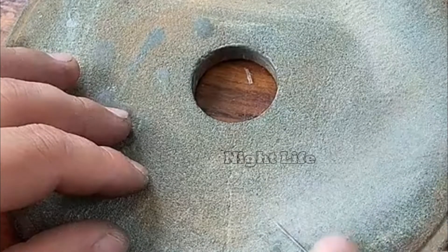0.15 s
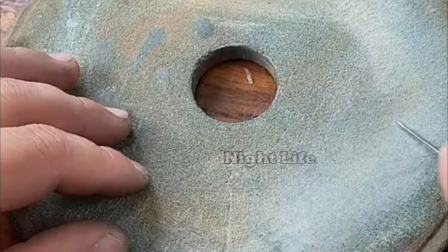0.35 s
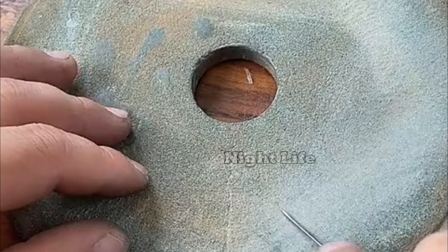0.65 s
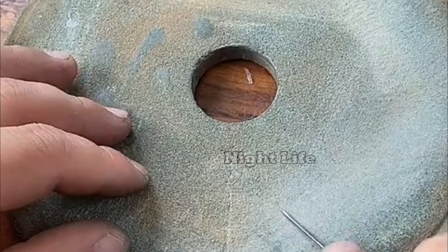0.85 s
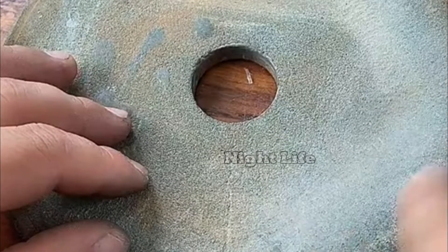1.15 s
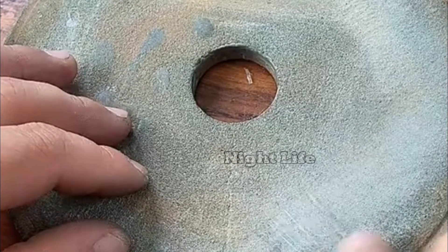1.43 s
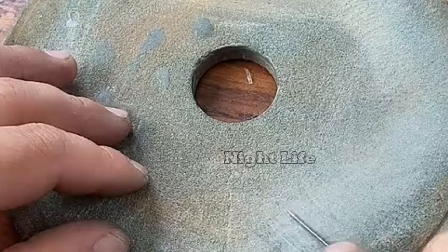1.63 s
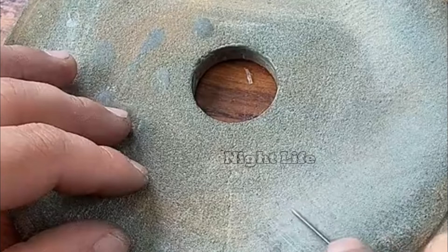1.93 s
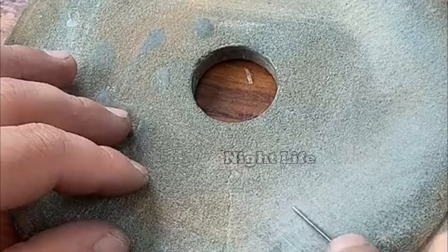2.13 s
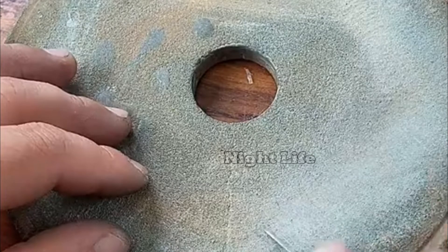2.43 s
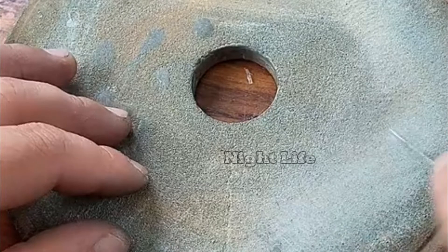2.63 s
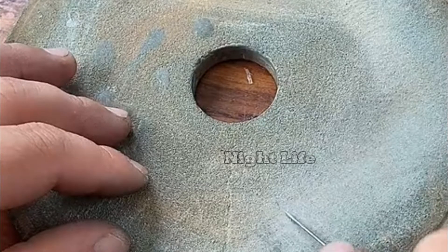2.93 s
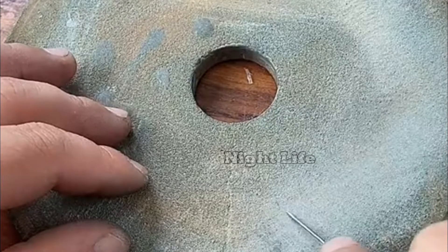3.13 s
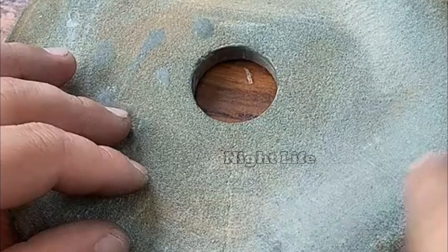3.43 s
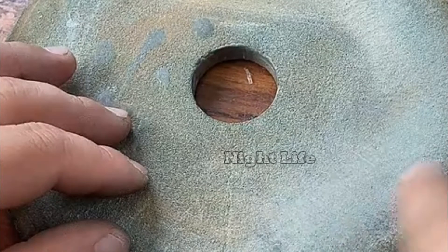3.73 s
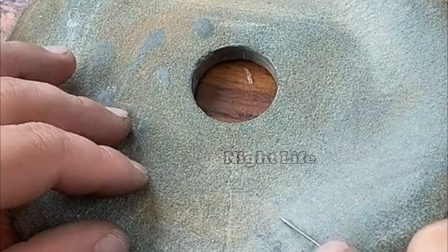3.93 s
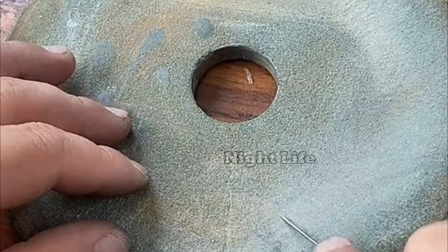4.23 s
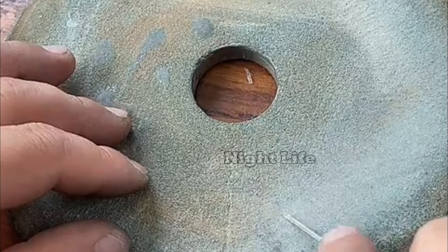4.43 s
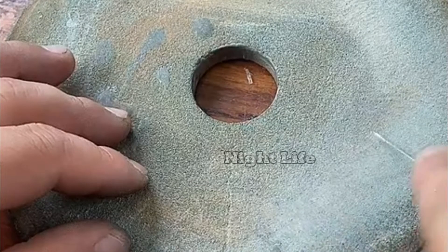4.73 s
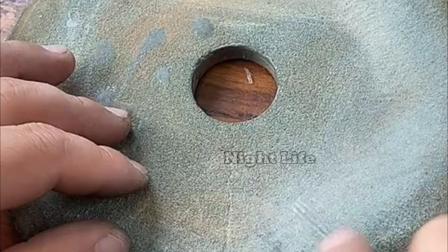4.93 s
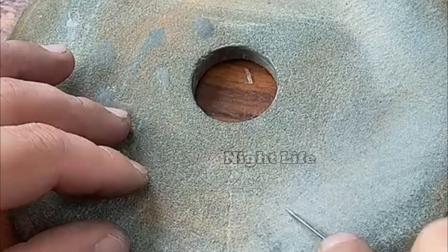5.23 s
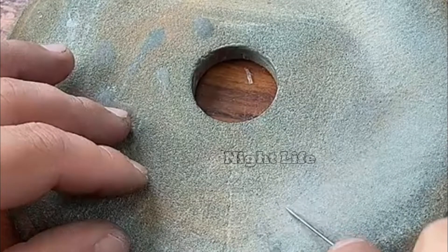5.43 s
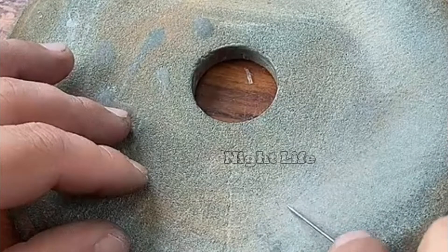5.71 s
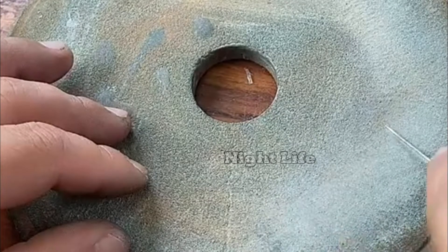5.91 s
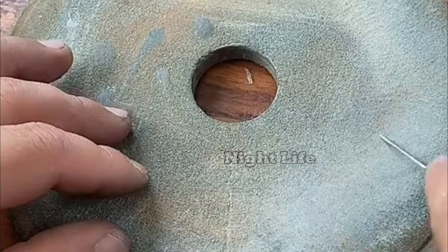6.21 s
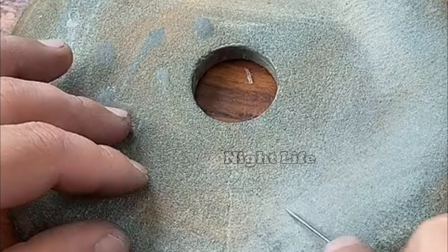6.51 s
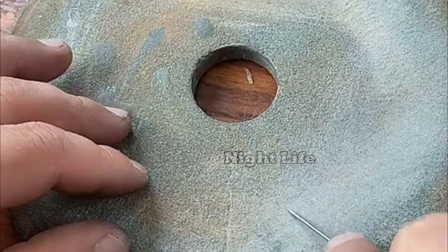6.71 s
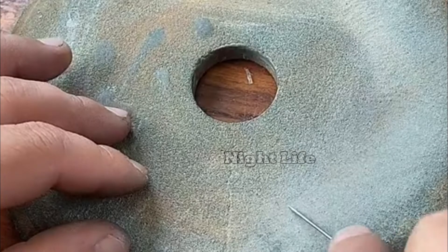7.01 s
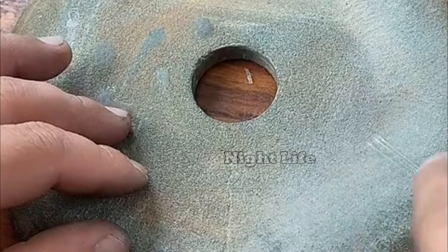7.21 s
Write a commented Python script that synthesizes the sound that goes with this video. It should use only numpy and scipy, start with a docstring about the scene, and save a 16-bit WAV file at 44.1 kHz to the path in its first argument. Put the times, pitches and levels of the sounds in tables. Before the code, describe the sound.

A thin steel hook point is sharpened by hand on a flat grinding stone, heard close and nearly dry in a quiet workshop. It scrapes in short runs of about half a second: a light landing, a firm pull, a lighter push and a hard sweep off. Each stroke is a gritty rasp with a high fizz, a slight metallic ring and a low drone from the stone. Runs begin right at the start and at about 1, 2.2, 3.3, 4.4, 5.8 and 7 seconds, the last still going at the end. Hands bump the wooden bench with soft, low thuds in and between runs, most clearly around 4 and 6.3 seconds. A tiny dry tick falls in the pause at 3 seconds. Faint, distant birds chirp in the first second or so and again between 5 and 6 seconds, over soft room tone.

```python
"""A quiet workshop, one microphone close to a flat grinding wheel lying on a wooden bench.
From the start a steel hook point is honed by hand in short runs: it lands lightly, is pulled back hard,
pushed forward lightly and swept off hard. Grit catches it, so the steel rasps and rings, and where it
bites the wheel drones. Hands bump the bench in and between runs; far birds chirp now and then over the
room's air. A dry tick falls in the pause at 3 s, and the seventh run is under way at the end."""
import sys
import numpy as np
from scipy import signal
from scipy.io import wavfile
from scipy.ndimage import uniform_filter1d

SR = 44100
rng = np.random.default_rng(int(sys.argv[2]) if len(sys.argv) > 2 else 0)


def digitize_waveform(pressure):
    """Quantize a signal to 16-bit integers and store it at the path in sys.argv[1].

    Rows of a 2-D input are taken as channels; values are limited to [-1, 1].
    """
    field = np.atleast_2d(pressure).T
    bounded = np.clip(field, -1, 1)
    quanta = np.round(bounded * 32767).astype(np.int16)
    wavfile.write(sys.argv[1], SR, quanta)


N = 324840

# passes of the point over the wheel, close to the microphone:
# (start [s], end [s], kind, bite time [s], rasp level [dB], wheel level [dB], shank level [dB])
HOOK_STROKES = [(0.029, .176, "pull", .053, -40.5, -27, -54), (0.188, 0.294, "push", .255, -43.5, -38, -54),
                (0.307, 0.468, "sweep", .339, -42.5, -32.5, -49),
                (0.979, 1.095, "land", .98, -44, -38, -64), (1.11, 1.261, "pull", 1.167, -37, -24.5, -52),
                (1.251, 1.387, "push", 1.335, -38, -35, -55),
                (1.386, 1.575, "sweep", 1.427, -37.7, -30, -49),
                (2.156, 2.256, "land", 2.194, -39, -31, -54),
                (2.272, 2.428, "pull", 2.329, -36.3, -25.5, -48),
                (2.418, 2.543, "push", 2.496, -37, -36.5, -58),
                (2.551, 2.689, "sweep", 2.592, -34.5, -29.5, -43),
                (3.28, 3.401, "land", 3.283, -43, -38, -57), (3.403, 3.559, "pull", 3.454, -39, -31, -48.5),
                (3.552, 3.667, "push", 3.616, -41, -38.5, -53),
                (3.669, 3.818, "sweep", 3.707, -36.7, -31.5, -62),
                (4.433, 4.567, "land", 4.445, -40.5, -36.5, -48.5),
                (4.556, 4.736, "pull", 4.625, -38, -31, -47),
                (4.712, 4.842, "push", 4.788, -37.5, -37.3, -53),
                (4.846, 5.007, "sweep", 4.868, -35.5, -28.5, -41.5),
                (5.756, 5.882, "land", 5.814, -40, -40.5, -62), (5.881, 6.042, "pull", 5.95, -34, -27, -44),
                (6.035, 6.154, "push", 6.115, -35, -35, -64),
                (6.157, 6.317, "sweep", 6.202, -33.5, -28.5, -41),
                (7.037, 7.176, "land", 7.047, -41, -41, -60),
                (7.185, 7.324, "pull", 7.228, -37, -31.5, -45),
                (7.307, 7.44, "push", 7.365, -40.5, -35, -43)]
# hand movement by kind of stroke: (skew [under 1 = fastest early], pointedness of the speed arch [power],
# slide before the grit holds [s], bite length [share of stroke], wheel drive from sliding [share])
HAND_MOTION = {"land": (1.01, 0.36, .001, 0.46, 1.4), "pull": (0.95, 1.36, 0.022, 0.37, .85),
               "push": (1.08, 0.72, 0.027, 0.034, 0.47), "sweep": (0.6, 1.71, 0.014, .44, 1)}
# tone by kind of stroke: (overtones [dB re rasp], sizzle [dB re rasp], tip whine [dB re rasp],
# treble lift of the rasp [dB], contact resonance at full speed [Hz])
STROKE_TONE = {"land": (-5, -0.5, -26, -0.4, 10558), "pull": (-3, -2, -17, 2, 10391),
               "push": (-3.5, -3, -21, 2.1, 10100), "sweep": (-5.5, -1.7, -17, 1, 10050)}
# treble of each run, as the point is set down at a new angle: (time [s], level [dB])
RUN_TREBLE = [(.25, 2.5), (1.27, 1.4), (2.42, -1.5), (3.55, -0.7), (4.72, 1), (6.04, -1.6), (7.2, -1)]
# modes of the hook's shank and of its tip: (frequency [Hz], width [Hz], level [dB])
SHANK_MODES = [(2515, 90, -6), (3390, 150, -6), (3650, 300, -10), (5340, 90, -6), (5810, 44, -1.5),
               (6062, 45, -4), (6765, 55, -5), (12008, 35, -9)]
TIP_MODES = [(12232, 36, 0), (12320, 60, -3)]
# modes of the wheel, damped by the resting hand: (frequency [Hz], width [Hz], level [dB])
WHEEL_MODES = [(201.2, 27, -9.5), (252.3, 24.4, -5), (323.6, 32, 2), (378.3, 33, 1.5), (430, 57, -8.5),
               (503.6, 22, -8.5)]
# colour of a grain of grit in the rasp, sizzle and wheel overtones: (frequency [Hz], level [dB])
RASP_SPECTRUM = [(1200, -28.5), (1700, -7), (1950, -3), (2500, -1), (3400, 1.5), (4050, -2.5), (4700, -8),
                 (5400, -7), (6900, -7), (7450, -8.5), (7950, -9), (8500, -7.5), (9100, -7.5), (10500, -21)]
SIZZLE_SPECTRUM = [(8200, -28.5), (9350, -9.5), (9750, -0.5), (10300, -1.5), (11000, -3), (11600, -7.5),
                   (12400, -9.5), (13000, -12.5), (14200, -22), (16000, -21)]
OVERTONE_SPECTRUM = [(400, -24.5), (560, -1), (760, -3.5), (930, 3.5), (1130, 0.5), (1350, -7.5),
                     (1650, -11), (2100, -26)]
# hands bumping the wheel and bench: (time [s], level [dB], pitch [Hz])
HAND_BUMPS = [(0.708, -32, 57.5), (.754, -31.5, 70), (.785, -29, 51), (.884, -27, 50), (1.637, -29, 71.5),
              (1.783, -33, 62.4), (1.82, -30.5, 63.5), (1.928, -26, 51.7), (2.174, -27, 51),
              (2.502, -31, 70.4), (3.398, -30, 64), (3.548, -29, 42), (3.922, -30, 73.5),
              (3.955, -23, 52.6), (4.045, -32.5, 64.4), (5.914, -24.5, 70.5), (6.279, -20, 56),
              (6.349, -34.5, 62)]
# low rumble of the bench: (frequency [Hz], level [dB])
BENCH_SPECTRUM = [(22, -20), (32, 4.5), (55, -2.5), (80, -2.5), (105, -8.5), (130, -0.5), (165, -13),
                  (260, -33), (500, -62)]
# the two pings of one small dry tick: (time [s], frequency [Hz], width [Hz], level [dB])
TICK_PINGS = [(3.045, 7940, 780, -28.5), (3.0478, 7540, 1200, -34)]
# small birds far off: (time [s], length [s], first pitch [Hz], last pitch [Hz], level [dB])
BIRD_CHIRPS = [(0.146, 0.032, 2730, 2720, -42.5), (0.459, 0.0525, 2830, 2545, -46.5),
               (0.71, 0.058, 2314, 1816, -55), (1.0, 0.043, 3090, 2810, -42.5),
               (1.048, 0.038, 2394, 2566, -43.5), (1.077, .027, 2925, 3050, -37),
               (5.133, 0.02, 2500, 3030, -46), (5.511, 0.051, 1993, 1880, -53),
               (5.785, 0.086, 2950, 2645, -40), (5.849, 0.054, 3300, 3020, -40.5),
               (6.097, .043, 2770, 2490, -40.5)]
# the workshop's air: (frequency [Hz], level [dB])
AIR_SPECTRUM = [(71, -32.5), (120, -20), (141, -21), (163, -33), (192, -8), (261, -18), (289, -13.5),
                (400, -12.5), (491, -17.5), (963, -20), (1890, -26.5), (6570, -35), (8560, -36),
                (15800, -61.5)]
# the workshop's reverberation: (frequency [Hz], time to fall 60 dB [s])
ROOM_DECAY = [(150, .25), (500, .3), (3000, .3), (8000, .28), (15000, .24)]


def stroke(row, skim_s=.027, bite_s=.0032, release_s=.036, treble_hz=4700):
    """One pass of the point, heard close: the same grains shake the steel and the wheel."""
    start, end, kind, bite, rasp_db, wheel_db, shank_db = row
    skew, pointed, slide_s, bite_share, slide_drive = HAND_MOTION[kind]
    overtone_db, sizzle_db, tip_db, lift_db, contact_hz = STROKE_TONE[kind]
    bright_db = np.interp(start, *np.transpose(RUN_TREBLE))
    t = start - skim_s + np.arange(SR // 3) / SR
    progress = np.clip((t - start) / (end - start), 0, 1)
    grip = np.clip((t - start - slide_s) / bite_s + .5, 0, 1)
    speed = hand_speed(progress, skew, pointed, skim_s)
    speed *= amp(-3 * (1 - grip))  # the point slides lightly until the grit takes hold
    hold_s = bite_share * (end - start)
    pressure = np.clip((t - bite) / bite_s, 0, 1) * np.clip(1 - (t - bite - hold_s) / release_s, 0, 1)
    grains = grit(len(t))
    scrape = grains * speed
    # the angle of the point sets how bright it rasps and which shank modes it favours
    rasp_spectrum = [(hz, db + (lift_db + bright_db) * (hz > treble_hz)) for hz, db in RASP_SPECTRUM]
    shank_modes = [(hz + width * rng.uniform(-1.05, 1), width, db + 3 * rng.standard_normal())
                   for hz, width, db in SHANK_MODES]
    drone = wheel_drone(grains, pressure + slide_drive * np.sqrt(speed))
    overtones = colour(grains * (speed + .5 * pressure), OVERTONE_SPECTRUM)
    tip_whine = ring(grains * progress ** 2, TIP_MODES) * speed
    layers = [(colour(scrape, rasp_spectrum), rasp_db - .5),
              (sizzle(scrape, speed, contact_hz), rasp_db + sizzle_db + bright_db),
              (ring(scrape, shank_modes), shank_db + 1),
              (tip_whine, rasp_db + tip_db - 6),
              (drone, wheel_db),
              (overtones, rasp_db + overtone_db)]
    length_gain = np.sqrt((end - start) * SR / len(t))  # sets the rms over the stroke's own length
    return t[0], length_gain * sum(amp(db) * unit_rms(sound) for sound, db in layers)


def hand_speed(progress, skew, pointed, skim_s, touch_s=.016, skim_db=-12):
    """An arch of speed: fingers cushion the touch and lift, and the point skims on through the turn."""
    arch = np.maximum(np.sin(np.pi * progress ** skew), 0) ** pointed
    cushioned = abs(uniform_filter1d(arch, int(touch_s * SR) + 1))
    return cushioned + amp(skim_db) * abs(uniform_filter1d(cushioned, int(2 * skim_s * SR)))


def grit(count, median_gap_s=1 / 450, crumble_s=.00069, fine_db=-4, clump_db=2):
    """The point catches at uneven intervals; each catch crumbles in a burst, with fine abrasion between."""
    gaps, dust = rng.standard_normal((2, count))
    at = (np.cumsum(np.exp(.6 * gaps)) * median_gap_s * SR).astype(int)
    catches = np.zeros(count)
    catches[at[at < count]] = 1
    bursts = unit_rms(die_away(catches, crumble_s))
    return dust * np.hypot(bursts, amp(fine_db)) * amp(clump_db * wander(count, 149.5))


def sizzle(scrape, speed, full_speed_hz, rest_hz=9900, width_hz=1300, rock_hz=350):
    """High fizz of the grit; the contact resonance climbs with speed and wavers as the point rocks."""
    glide_hz = rest_hz + (full_speed_hz - rest_hz) * speed + rock_hz * wander(len(scrape), 64)
    contact = resonate(resonate(scrape, glide_hz, width_hz), glide_hz, width_hz)
    return unit_rms(colour(scrape, SIZZLE_SPECTRUM)) + amp(-5) * unit_rms(contact)


def wheel_drone(grains, drive, steadiness=.4, die_s=.0016):
    """The heavy wheel answers only the slow force; the dragging point holds its swing fairly even."""
    slow_force = colour(grains, [(170, 0), (560, .025)])
    swing = ring(slow_force, WHEEL_MODES)
    size = np.sqrt(abs(uniform_filter1d(unit_rms(swing) ** 2, SR // 100)) + .094)
    return swing / size ** steadiness * die_away(drive, die_s)


def bench_thud(row, rise_s=.01, knock_s=.0088):
    """A soft push: the bench sways for a few cycles and its top gives a dull knock."""
    start, db, hz = row
    t = np.arange(SR // 5) / SR
    knock_hz = 128 * rng.uniform(.65, 1.06)
    sway = t / rise_s * np.exp(1 - t / rise_s) * np.sin(2 * np.pi * hz * t)
    knock = t / knock_s * np.exp(1 - t / knock_s) * np.sin(2 * np.pi * knock_hz * t)
    return start, amp(db - 2) * (sway + amp(-8) * knock)


def bite_nudges():
    """The bench rocks as each pull, push or sweep bites: (time [s], level [dB], pitch [Hz])."""
    return [(bite, rng.uniform(-38, -32), rng.uniform(55, 108))
            for _, _, kind, bite, *_ in HOOK_STROKES if kind != "land"]


def bench_rumble(resting_db=-54, working_db=-48, lumpy_db=4.5):
    """Lumpy low rumble of the bench, stronger while the arm is working."""
    t = np.arange(N) / SR
    working = np.any([(t > start) & (t < end) for start, end, *_ in HOOK_STROKES], axis=0)
    effort = uniform_filter1d(working.astype(float), SR // 20)
    rumble = unit_rms(colour(rng.standard_normal(N), BENCH_SPECTRUM, size=16384))
    return rumble * (amp(resting_db) + amp(working_db) * effort) * amp(lumpy_db * wander(N, 15))


def tick(row):
    """A high, heavily damped ping."""
    start, hz, width, db = row
    t = np.arange(SR // 50) / SR
    return start, amp(db) * np.sin(2 * np.pi * hz * t) * np.exp(-np.pi * width * t)


def bird_chirp(row, warble_hz=190, depth_hz=135):
    """A small bird's short gliding whistle with a fast, uneven warble, fading as it goes."""
    start, length, first_hz, last_hz, db = row
    count = int(length * SR)
    warble = np.sin(2 * np.pi * np.cumsum(warble_hz * (1 + .27 * wander(count, 200))) / SR)
    hz = np.linspace(first_hz, last_hz, count) + depth_hz * (warble + .45 * wander(count, 488))
    envelope = signal.windows.tukey(count, .5) * np.exp(-.67 * np.linspace(0, 1, count))
    flutter = amp(1.3 * wander(count, 283))
    whistle = np.sin(2 * np.pi * np.cumsum(hz) / SR)
    return start, amp(db) * unit_rms(whistle * envelope * flutter)


def workshop_air(quiet_db=-59, swell_db_per_s=17, sink_db_per_s=12.5, max_swell_db=8, usual_rasp_db=-37):
    """Soft room tone that swells during each run, faster under hard strokes, and sinks in each pause."""
    hop = 441
    t = np.arange(0, N, hop) / SR
    efforts = np.max([((t > start) & (t < end)) * amp(rasp_db - usual_rasp_db)
                      for start, end, _, _, rasp_db, *_ in HOOK_STROKES], axis=0)
    swell_db = [0]
    for effort in efforts:
        db_per_s = swell_db_per_s * effort if effort else -sink_db_per_s
        swell_db.append(np.clip(swell_db[-1] + db_per_s * hop / SR, 0, max_swell_db))
    db = quiet_db + np.interp(np.arange(N) / SR, t, swell_db[1:])
    return unit_rms(colour(rng.standard_normal(N), AIR_SPECTRUM)) * amp(db)


def workshop_echo(x):
    """The room returns a short, diffuse tail of sparse reflections."""
    count = SR // 2
    reflections = rng.standard_normal(count) * (rng.random(count) < .08)
    reflections *= np.arange(count) > SR // 250  # none reach the microphone in the first 4 ms
    hz, t, spectrum = signal.stft(reflections, SR, nperseg=256)
    decay = amp(-60 * t / value_at(ROOM_DECAY, hz)[:, None])
    tail = signal.istft(spectrum * decay, SR, nperseg=256)[1]
    return signal.fftconvolve(x, tail / np.linalg.norm(tail))[:N]


def amp(db):
    """Decibels to gain."""
    return 10 ** (np.asarray(db) / 20)


def unit_rms(x):
    """Scales to an rms of one."""
    return x / np.sqrt(np.mean(x ** 2) + 1e-20)


def value_at(points, hz):
    """Reads a curve on a log-frequency axis."""
    frequencies, values = np.transpose(points)
    return np.interp(np.log(hz + 1), np.log(frequencies + 1), values)


def wander(count, per_s):
    """A random drift of about unit size, with per_s turning points a second."""
    position = np.arange(count) * per_s / SR
    return np.interp(position, np.arange(count), rng.standard_normal(count))


def die_away(x, decay_s):
    """Gives every sample an exponential tail."""
    return signal.lfilter([1], [1, -np.exp(-1 / (decay_s * SR))], x)


def colour(x, points, size=4096):
    """Minimum-phase filter with the given spectrum, falling 36 dB an octave beyond its ends."""
    hz = np.fft.rfftfreq(size, 1 / SR) + 1
    octaves_out = abs(np.log2(hz / np.clip(hz, points[0][0], points[-1][0])))
    log_gain = np.log(amp(np.maximum(value_at(points, hz) - 36 * octaves_out, -90)))
    mirrored = np.concatenate([log_gain, log_gain[-2:0:-1]])
    taps = np.fft.ifft(np.exp(np.conj(signal.hilbert(mirrored)))).real
    return signal.fftconvolve(x, taps[:size // 2])[:len(x)]


def ring(x, modes):
    """Passes x through parallel resonances of alternating sign."""
    return sum((-1) ** k * amp(db) * signal.lfilter(*signal.iirpeak(hz, hz / width, SR), x)
               for k, (hz, width, db) in enumerate(modes))


def resonate(x, hz, width_hz):
    """A resonance whose centre follows the curve hz."""
    turn = np.exp(2j * np.pi * np.cumsum(hz) / SR)
    pole = np.exp(-np.pi * width_hz / SR)
    return 2 * (turn * signal.lfilter([1 - pole], [1, -pole], x / turn)).real


def play(source, rows):
    """Sounds every row of a table at its time on one track."""
    track = np.zeros(N)
    for start, sound in map(source, rows):
        part = track[max(round(start * SR), 0):][:len(sound)]
        part += sound[:len(part)]
    return track


def scene():
    """At the microphone the hook is close and nearly dry; the birds are far and echo."""
    hook = play(stroke, HOOK_STROKES)
    birds = play(bird_chirp, BIRD_CHIRPS)
    ticks = play(tick, TICK_PINGS)
    echoes = workshop_echo(amp(-17) * hook + amp(-3) * birds + amp(-11) * ticks)
    thuds = play(bench_thud, HAND_BUMPS + bite_nudges())
    return (hook + thuds + bench_rumble() + ticks + amp(-4) * birds + workshop_air() + echoes)[None]


def record(dry, low_cut_hz=30, band_limit_hz=15850):
    """The microphone's low cut and the recorder's band limit."""
    low_cut = signal.butter(2, low_cut_hz, "highpass", fs=SR, output="sos")
    band_limit = signal.firwin(601, band_limit_hz, window=("kaiser", 9), fs=SR)
    return signal.oaconvolve(signal.sosfilt(low_cut, dry), band_limit[None], "same")


dry = scene()
out = record(dry)
digitize_waveform(out)
```